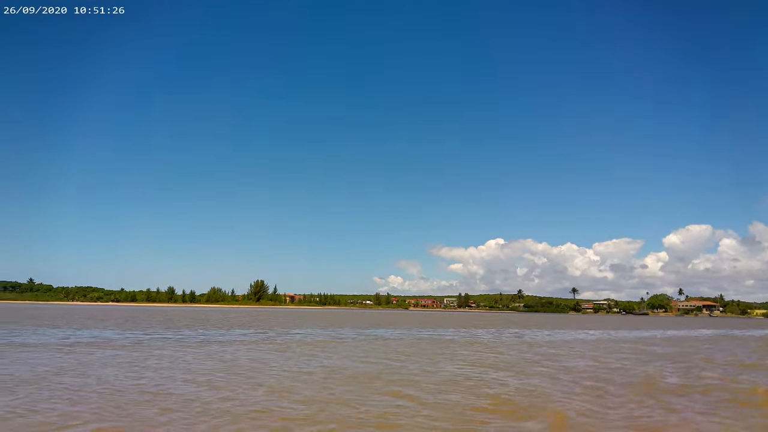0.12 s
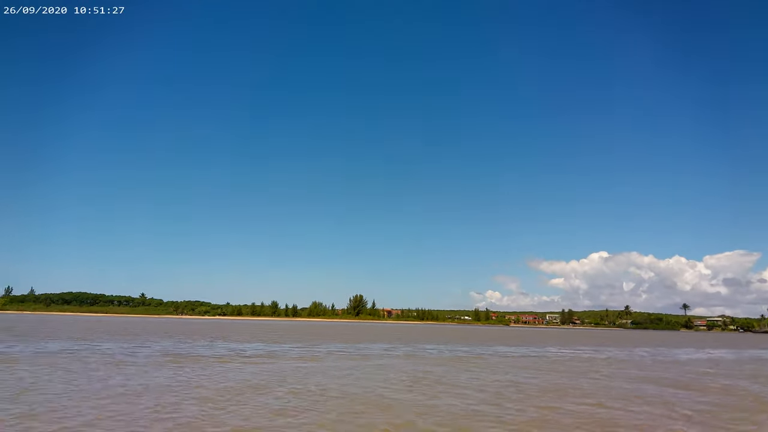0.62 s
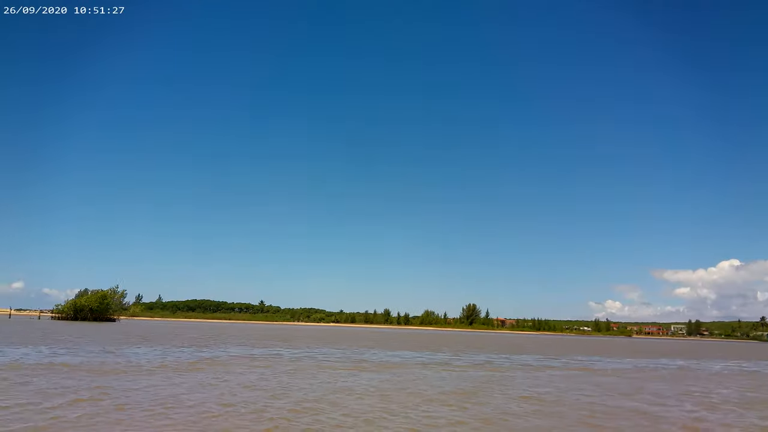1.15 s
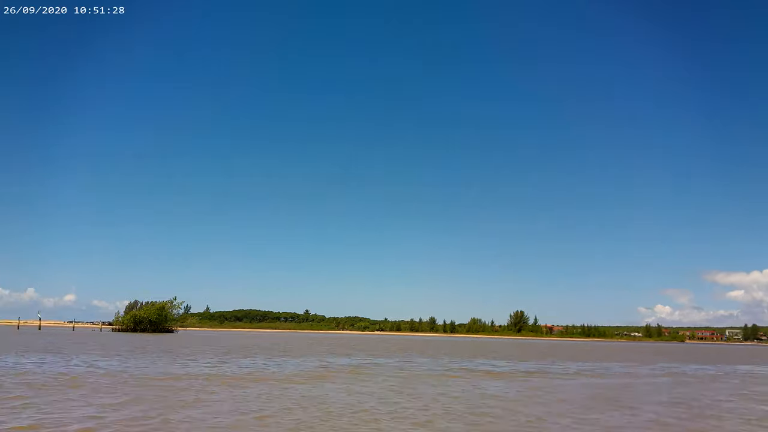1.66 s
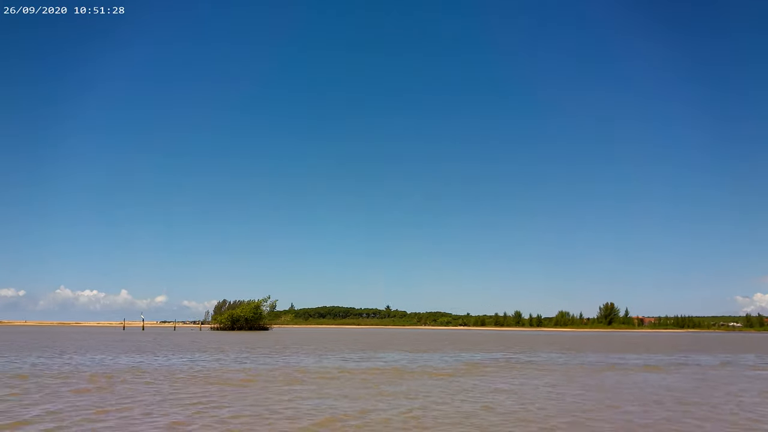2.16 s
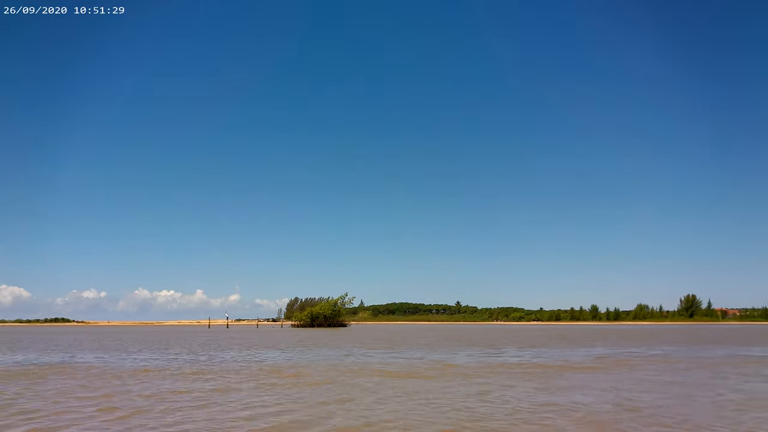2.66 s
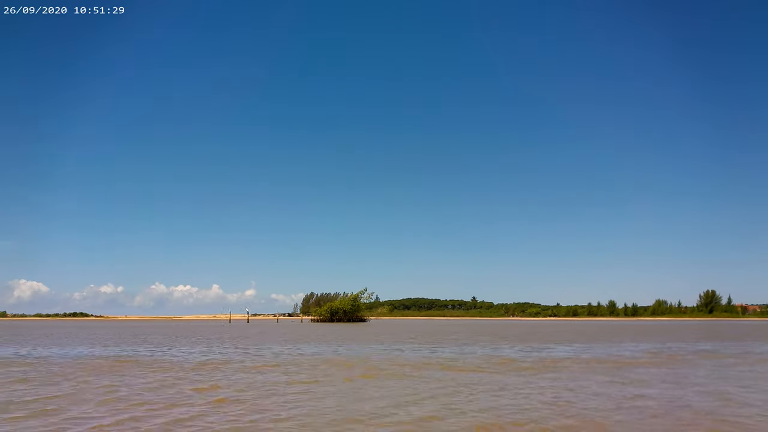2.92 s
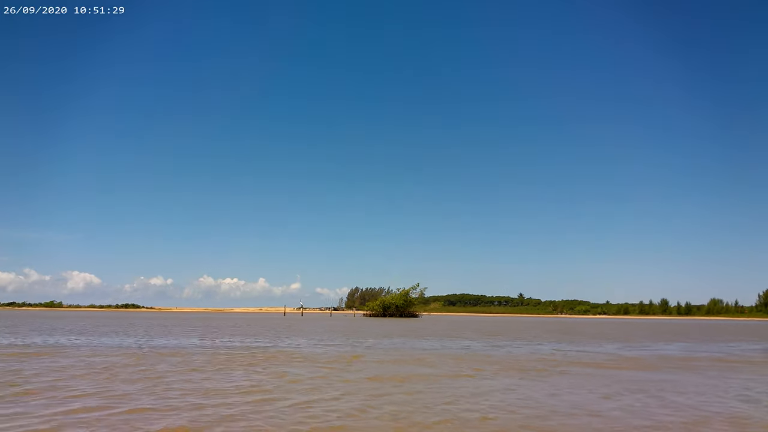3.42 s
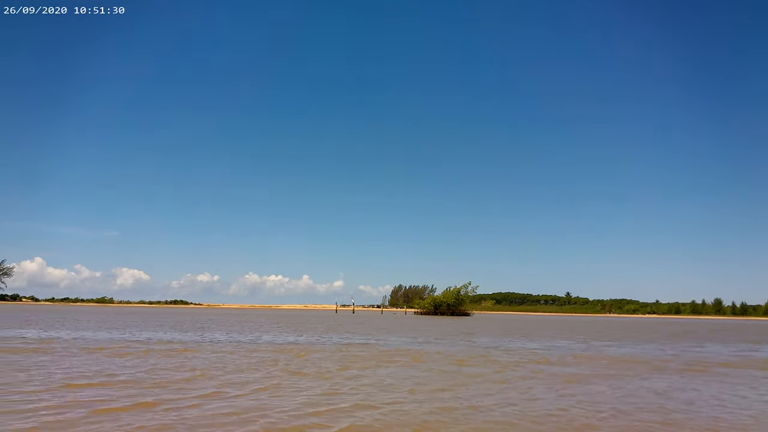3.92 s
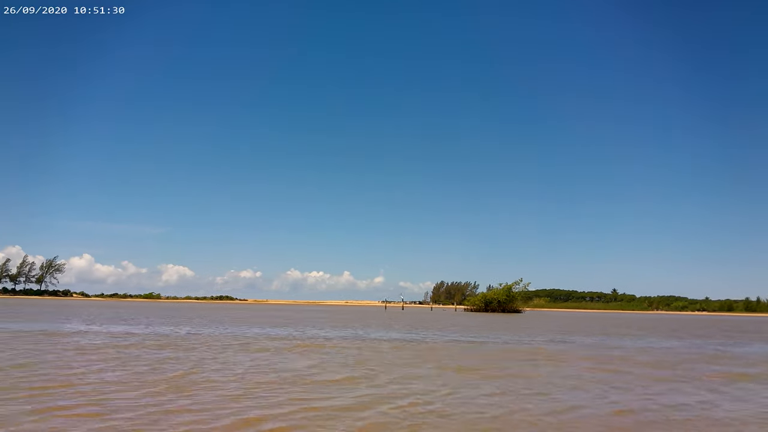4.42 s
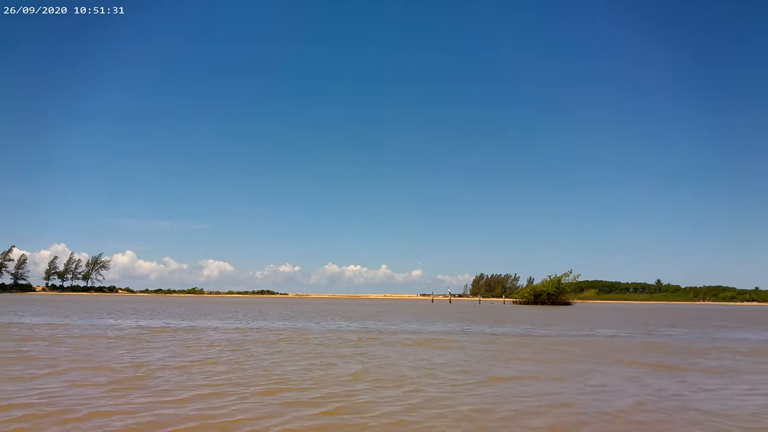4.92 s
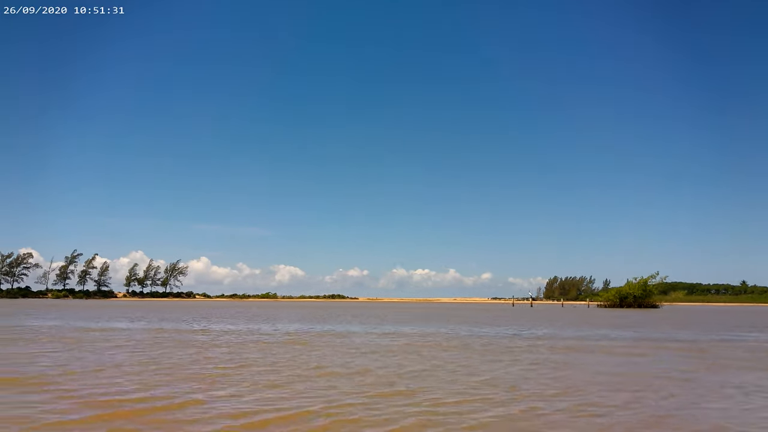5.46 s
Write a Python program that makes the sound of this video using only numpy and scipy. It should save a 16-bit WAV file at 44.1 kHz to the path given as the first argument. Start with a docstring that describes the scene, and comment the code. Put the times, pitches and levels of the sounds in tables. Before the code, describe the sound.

A small boat's single-cylinder engine chugs without pause, about fourteen beats a second, close to a small microphone on open water. Low hull and exhaust thuds carry hard metallic knocks and light valve ticks. Exhaust and wake noise pulses with each beat, with thin spray fizz above. The knocking softens slightly as the microphone turns away; loud peaks clip.

```python
"""A slow single-cylinder boat engine thuds about fourteen times a second, close to a small microphone.
Every cycle sets hull, exhaust pipe and covers ringing as short, low, decaying tones.
Combustion blows and metal contacts make the engine block ring, and valves tick as bright noise bursts.
Loose panels sing wavering tones; wake, exhaust and spray are coloured noise that swells with the engine.
The microphone swings away from the engine, and its input overloads and clips."""
import sys
import numpy as np
from scipy import signal
from scipy.fft import rfft, irfft, next_fast_len
from scipy.io import wavfile
from scipy.ndimage import uniform_filter1d, map_coordinates

SR = 44100
rng = np.random.default_rng(int(sys.argv[2]) if len(sys.argv) > 2 else 0)


def ratio_of_db(decibels):
    """Turn decibels (scalar or array-like) into linear amplitude factors; 0 dB maps to 1."""
    return 10 ** (np.asarray(decibels, float) / 20)


def store_pcm(level_fs):
    """Save levels as 16-bit WAV."""
    pcm = np.round(np.clip(level_fs, -1, 1) * 32767).astype(np.int16)
    wavfile.write(sys.argv[1], SR, np.atleast_2d(pcm).T)


N = 245637
T = np.arange(N) / SR
CYCLES = np.arange(-2, 81)  # cycle numbers, starting before the first sample so that tails carry in
RISE_S = 0.0007  # time constant with which contacts and ticks start

# Turning of the engine: (time [s], cycles turned so far [cycles])
CRANK_TURNS = [(0.0, -0.28), (0.5, 6.905), (1.4, 19.79), (3.85, 55.092), (5.57, 79.815)]


def moments(place, jitter_s):
    """Times at which the turning engine passes a place in each cycle, with a little random jitter."""
    s, turns = np.transpose(CRANK_TURNS)
    speed = 14.4  # cycles per second outside the table
    before, after = turns[0] - speed, turns[-1] + speed * (7 - s[-1])
    times = np.interp(CYCLES + place, np.r_[before, turns, after], np.r_[-1, s, 7])
    return times + jitter_s * rng.standard_normal(len(CYCLES))


def varied(db, spread_db):
    """One gain for each cycle, because no two cycles are equally strong."""
    return ratio_of_db(db + spread_db * rng.standard_normal((len(CYCLES), 1)))


def laid(shapes, times):
    """Adds up one sound shape at each time, letting neighbours overlap."""
    starts = np.round((times + 1) * SR).astype(int)[:, None]  # one spare second in front
    at = starts + np.arange(shapes.shape[1])
    return np.bincount(at.ravel(), shapes.ravel(), N + 3 * SR)[SR:SR + N]


def unit(x):
    """Scales a signal to an rms of 1."""
    return x / np.sqrt(np.mean(x ** 2) + 1e-20)


def wobble(rate):
    """A smooth random curve through random points, rate points a second."""
    return map_coordinates(rng.standard_normal(int(N * rate / SR) + 4), [T * rate])


# Swing of the microphone away from the engine: (time [s], share of the swing [0-1])
SWING = [(0, 0.16), (.6, 0), (1.2, 0.4), (2.2, 0.7), (4, 1), (5.57, 1)]


def level(facing_db, change_db, wander_db):
    """Gain of a part: it changes as the microphone swings away, and wanders slowly."""
    away = np.interp(T, *np.transpose(SWING))
    return ratio_of_db(facing_db + change_db * away + wander_db * wobble(3))


# Passing swells and dips of one part: (part [name], middle [s], half length [s], level change [dB])
PART_SHIFTS = [("thump", 2.0, .5, 3), ("hull", 3.95, 0.6, -4.5), ("cover", 0.18, .5, -5.5),
               ("cover", 5.9, 0.45, -2.2), ("pipe", 0.092, 0.24, 3)]


def shifts(name):
    """Gain of a part that weakens or swells for a while."""
    return ratio_of_db(sum(db * np.exp(-((T - middle) / half) ** 4)
                   for part, middle, half, db in PART_SHIFTS if part == name))


def ringing(pushes):
    """Each push swells and dies as a tone on its resonance, a little differently every cycle."""
    t = np.arange(SR // 5) / SR
    out = np.zeros(N)
    for place, hz, swell, sharp, db, drift in pushes:
        times = moments(place, jitter_s=.0003)
        pitch = hz * (1 + .006 * rng.standard_normal((len(CYCLES), 1)))
        body = (t / swell * np.exp(1 - t / swell)) ** sharp  # strongest at t = swell
        gain = varied(db + drift * times[:, None], spread_db=1)
        out += laid(gain * body * np.sin(2 * np.pi * pitch * t), times)
    return unit(out)


# Thuds in each cycle: (place in cycle [0-1], ring [Hz], time to peak [s], sharpness [power],
# relative level [dB], drift [dB/s])
THUMP_PUSHES = [(.742, 54, .022, 6, 0, 0), (.385, 60, .012, 4, -9, 0)]


def thump():
    """The deepest thuds of the engine ring briefly at a low pitch."""
    return level(-23.5, -0.5, 1) * shifts("thump") * ringing(THUMP_PUSHES)


# Pushes on the hull: (place in cycle [0-1], ring [Hz], time to peak [s], sharpness [power],
# relative level [dB], drift [dB/s])
HULL_PUSHES = [(.98, 118, .019, 8, 0, 0), (.402, 118, .019, 8, -2.5, 0)]


def hull():
    """The shaken hull answers with its own low ring."""
    return level(-14.5, -2.5, 0.5) * shifts("hull") * ringing(HULL_PUSHES)


# Pushes in the exhaust pipe: (place in cycle [0-1], ring [Hz], time to peak [s], sharpness [power],
# relative level [dB], drift [dB/s])
PIPE_PUSHES = [(.81, 193, .011, .6, 0, 0), (.16, 158, .012, 1.2, -4, -.3)]


def pipe():
    """The exhaust pipe rings after each push."""
    return level(-20.5, 4, 0.5) * shifts("pipe") * ringing(PIPE_PUSHES)


# Pushes on the covers: (place in cycle [0-1], ring [Hz], time to peak [s], sharpness [power],
# relative level [dB], drift [dB/s])
COVER_PUSHES = [(.807, 248, .013, .9, 1, -2.5), (.391, 297, .008, 2.2, -2.5, 1),
                (.805, 273, .012, 1.2, -9, 1.2)]


def cover():
    """The shaken covers ring, each at its own pitch."""
    return level(-21.5, 1, 0.85) * shifts("cover") * ringing(COVER_PUSHES)


# Rattles in each cycle: (place in cycle [0-1], ring [Hz], time to peak [s], sharpness [power],
# relative level [dB], drift [dB/s])
RATTLE_PUSHES = [(.08, 640, .004, 1.5, 0, 0), (.23, 560, .003, 1.5, -1, 0), (.35, 600, .003, 1.5, -3, 0),
                 (.93, 700, .003, 1.5, -2, 0)]


def rattle():
    """Very short, higher rings rattle along with every cycle."""
    return level(-30, 0.5, 1) * ringing(RATTLE_PUSHES)


# Metal contacts in each cycle: (place in cycle [0-1], relative level [dB], hold [s], decay by 60 dB [s])
METAL_CONTACTS = [(.945, 7, 0.002, 0.03), (0.01, -1.5, 0.0008, 0.08), (.045, -11.5, 0.0021, 0.071),
                  (0.17, -14, 0.013, 0.28), (0.8, -12, 0.014, 0.052), (.37, -19.5, 0.0012, .05),
                  (.69, -11.5, 0.002, 0.04)]


def contacts():
    """Strength of the metal contacts over time: quick start, short hold, decay."""
    t = np.arange(SR // 12) / SR
    gate = np.zeros(N)
    for place, db, hold, t60 in METAL_CONTACTS:
        start = 1 - np.exp(-t / RISE_S)
        decay = ratio_of_db(-60 * np.maximum(t - hold, 0) / t60)
        gate += laid(varied(db, spread_db=.8) * start * decay, moments(place, jitter_s=.0011))
    return gate


def filtered(x, response):
    """Filters a sound by a response given as a function of frequency."""
    m = next_fast_len(N + 8192)
    return irfft(rfft(x, m) * response(np.fft.rfftfreq(m, 1 / SR)), m)[:N]


def modes(table, f):
    """Summed response of resonances, with the sign turned at every second one."""
    total = 0
    for k, (hz, width, db) in enumerate(table):
        total = total + (-1) ** k * ratio_of_db(db) * 1j * f * width / (hz * hz - f * f + 1j * f * width)
    return total


# Single hard blows of combustion: (place in cycle [0-1], relative level [dB])
COMBUSTION_BLOWS = [(.945, 14), (.995, 12), (.04, 15), (.1, 10), (.15, 7)]
# Resonances of the engine block: (frequency [Hz], width [Hz], relative level [dB])
BLOCK_MODES = [(1660, 134, 6.5), (2500, 190, 5), (2784, 470, -1.5), (4200, 530, -18), (5130, 440, -25.5),
               (1030, 97, -18), (1800, 230, -9.5)]


def knock(gate):
    """Combustion blows and spiky contact noise ring the block; the casing muffles the top."""
    grit = rng.standard_normal(N) * ratio_of_db(1.5 * rng.standard_normal(N))
    strikes = (gate + 0.13) * grit  # some grit stays between contacts
    for place, db in COMBUSTION_BLOWS:
        strikes += laid(varied(db, spread_db=1), moments(place, jitter_s=.0008))
    block = filtered(strikes, lambda f: modes(BLOCK_MODES, f) / (1 + 1j * f / 6000) ** 3)
    return level(-27.5, -4, 0.15) * unit(block)


def patchy(points, depth_db, envelope):
    """Coloured noise with random louder and softer patches in time and pitch, under an envelope."""
    z = signal.stft(rng.standard_normal(N + 512), nperseg=512)[2]
    field = uniform_filter1d(rng.standard_normal(z.shape), size=5, axis=0)
    field = uniform_filter1d(field, size=10, axis=1)
    noise = signal.istft(z * ratio_of_db(depth_db * unit(field)), nperseg=512)[1][:N]
    hz, db = np.transpose(points)
    return filtered(envelope * noise, lambda f: ratio_of_db(np.interp(np.log(f + 1), np.log(hz), db)))


# Light valve ticks in each cycle: (place in cycle [0-1], level [dB])
VALVE_TICKS = [(.35, -47.5), (.6, -55), (.66, -51.5), (.77, -54)]


def valves():
    """Short bright noise bursts: the ticks of the valve gear, coloured like the spray."""
    t = np.arange(SR // 30) / SR
    ticks = np.zeros(N)
    for place, db in VALVE_TICKS:
        shape = (1 - np.exp(-t / RISE_S)) * ratio_of_db(-60 * t / 0.024)  # decays by 60 dB in 0.024 s
        ticks += laid(varied(db, spread_db=3) * shape, moments(place, jitter_s=.001))
    return ticks * unit(patchy(SPRAY_COLOUR, depth_db=0.5, envelope=1))


# Moments of panel singing: (middle [s], half length [s], pitch [Hz], glide [Hz/s], level [dB])
PANEL_SONGS = [(0.045, .08, 464, 0, -27), (0.557, .07, 792, 150, -26.5), (1.0, .14, 471, -30.5, -23),
               (1.216, 0.059, 661, 179, -22), (1.289, 0.14, 784, -30, -24.5), (1.798, 0.26, 789, -2, -29),
               (2.332, .1, 474, -1.5, -24.5), (2.603, 0.075, 502, 1, -24), (3.359, 0.32, 471.4, 0, -28.5),
               (4.544, .08, 486, 101, -27.5)]


def singing():
    """A wavering tone swells and fades on a panel's pitch."""
    out = np.zeros(N)
    for middle, half, hz, glide, db in PANEL_SONGS:
        since = T - middle
        pitch = hz + glide * np.clip(since, -2 * half, 2 * half) + 4 * wobble(8)  # waver in Hz
        swell = ratio_of_db(db + 3.5 * wobble(30)) * np.exp(-(since / half) ** 2)  # flutter in dB
        out += np.sqrt(2) * swell * np.sin(2 * np.pi * np.cumsum(pitch) / SR)
    return out


# Loose panels that colour the rush: (frequency [Hz], width [Hz], relative level [dB])
PANEL_MODES = [(457, 58, 1.5), (675, 64, -5), (762, 76, -5), (809, 68, -1.5)]
# Colour of the water and exhaust rush: (frequency [Hz], relative level per Hz [dB])
RUSH_COLOUR = [(10, -50.5), (30, -11.5), (100, -8.5), (160, -3), (200, -4), (250, -9.5), (300, -7.5),
               (360, -14), (500, -14.5), (900, -18.5), (1050, -26), (2100, -34.5), (4000, -50.5),
               (8000, -89.5), (16000, -120)]


def rush(gate):
    """Exhaust and wake noise through the panels, swelling just after the metal contacts."""
    late = np.roll(gate, SR // 200)  # 5 ms later
    swell = 1 + 0.71 * uniform_filter1d(late, size=500)
    noise = patchy(RUSH_COLOUR, depth_db=0.25, envelope=swell)
    through_panels = filtered(noise, lambda f: 1 + np.abs(modes(PANEL_MODES, f)))
    return level(-14, -1, -0.15) * unit(through_panels)


# Colour of the spray: (frequency [Hz], relative level per Hz [dB])
SPRAY_COLOUR = [(1500, -24.5), (3200, 0.5), (5000, -7), (5900, -23.5), (6600, -12), (7500, -21.5),
                (10000, -28), (11300, -26.5), (12500, -31), (16000, -33.5)]


def spray(gate):
    """Fizz that comes in splashes and single drops on the hull, shaking with the engine."""
    splashes = ratio_of_db(.9 * wobble(3.7) + 2.0 * wobble(40))
    splashes *= 1 + 0.99 * uniform_filter1d(gate, size=600)
    drops = (rng.random(N) < 400 / SR) * rng.exponential(size=N)  # about 400 a second
    splashes *= 1 + 15 * uniform_filter1d(drops, size=40)
    return level(-47, 0.5, 0.65) * unit(patchy(SPRAY_COLOUR, depth_db=1.5, envelope=splashes))


def scene():
    """The engine, its ringing parts and the water, added together."""
    gate = contacts()  # shared, so that knock, rush and spray move together
    low = thump() + hull() + pipe() + cover() + rattle()
    bright = knock(gate) + valves() + singing()
    water = rush(gate) + spray(gate)
    return (low + bright + water)[None]


def roll_off(x):
    """The treble ends steeply here."""
    return signal.sosfilt(signal.butter(12, 15800, fs=SR, output="sos"), x)


def record(dry):
    """The overloaded input sits slightly off centre and clips with a short knee."""
    top, offset = .715, .007  # clipping level and shift, as shares of full scale
    x = dry - offset
    x = x / (1 + np.abs(x / top) ** 150) ** (1 / 150)
    return roll_off(x)


dry = scene()
out = record(dry)
store_pcm(out)
```